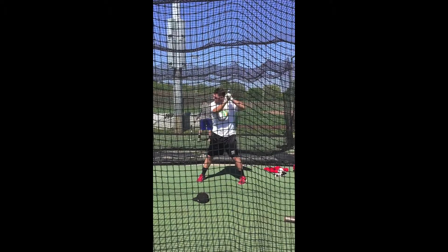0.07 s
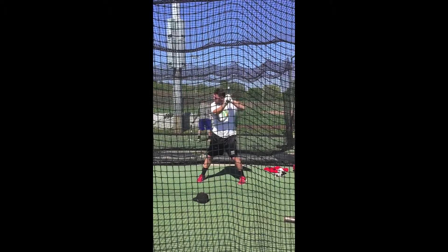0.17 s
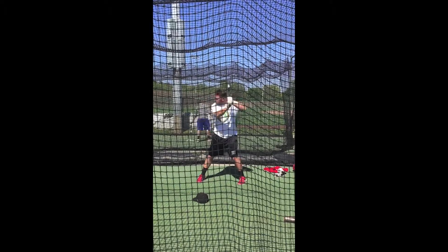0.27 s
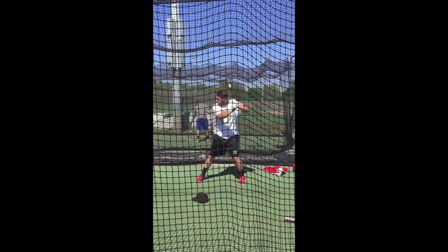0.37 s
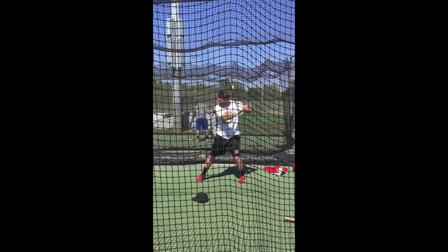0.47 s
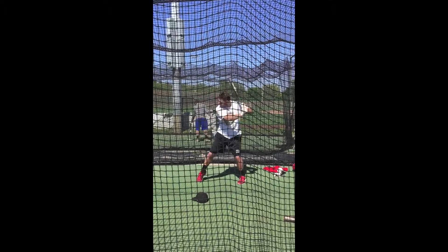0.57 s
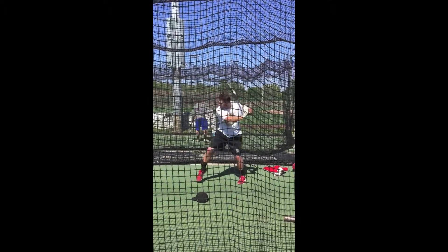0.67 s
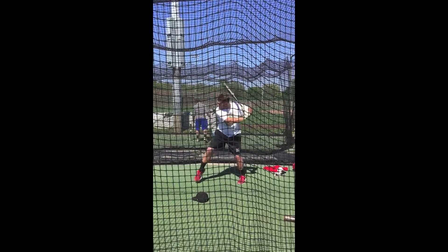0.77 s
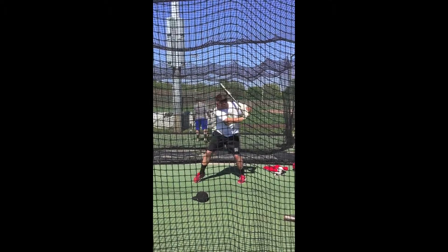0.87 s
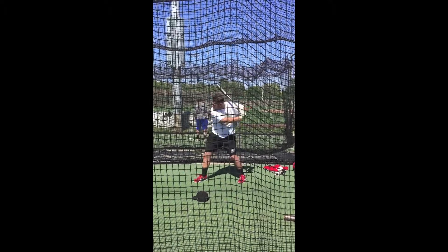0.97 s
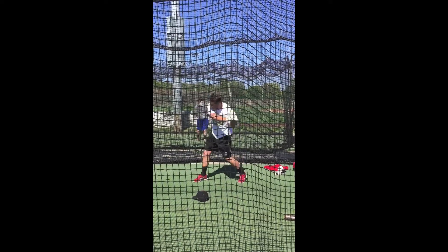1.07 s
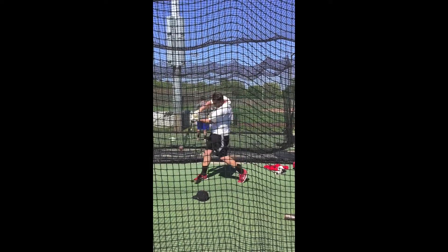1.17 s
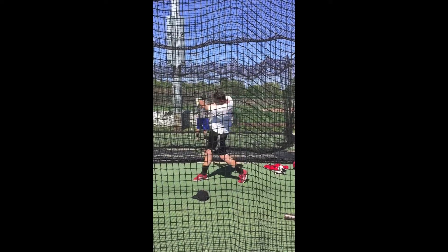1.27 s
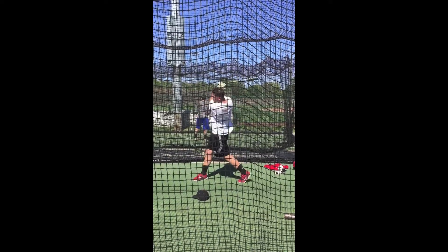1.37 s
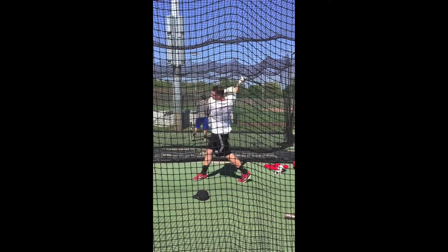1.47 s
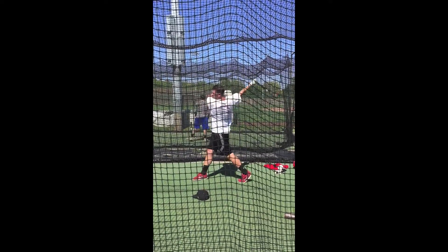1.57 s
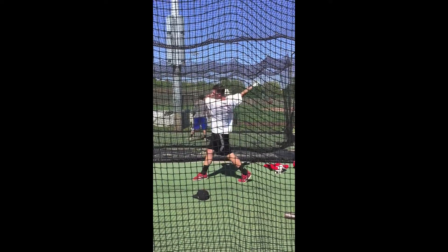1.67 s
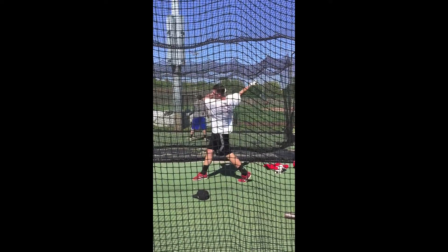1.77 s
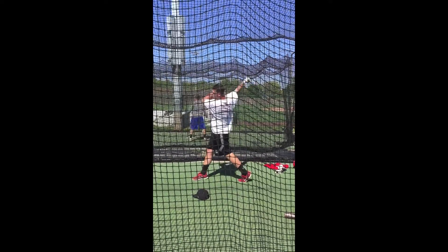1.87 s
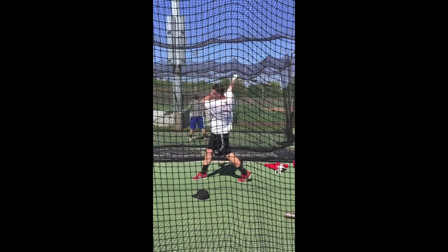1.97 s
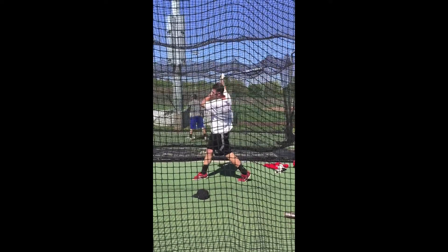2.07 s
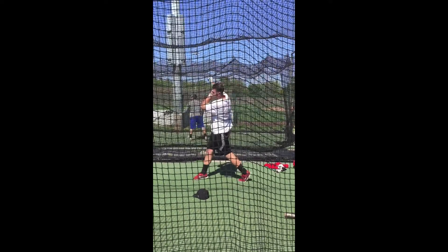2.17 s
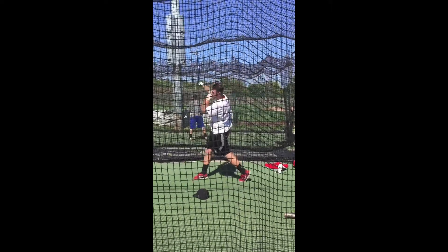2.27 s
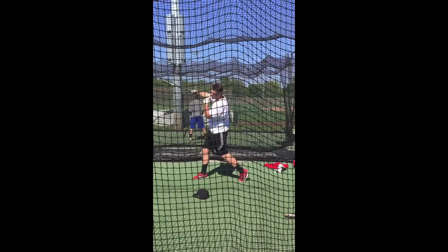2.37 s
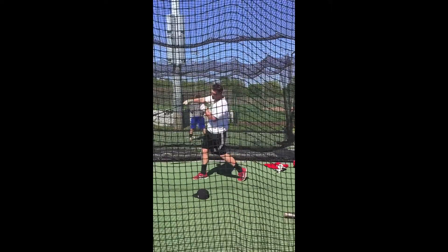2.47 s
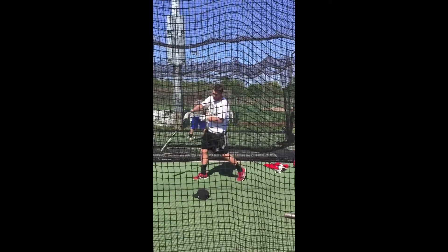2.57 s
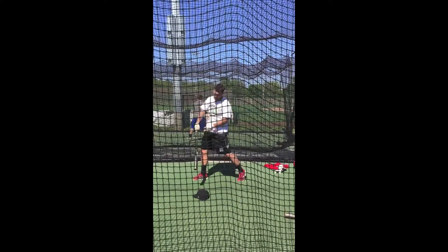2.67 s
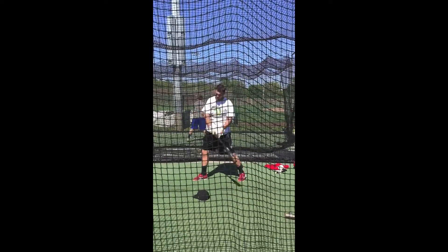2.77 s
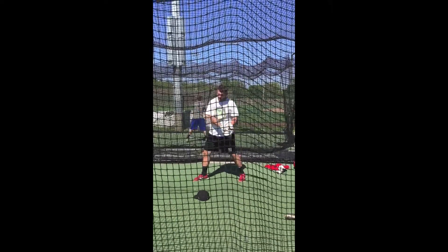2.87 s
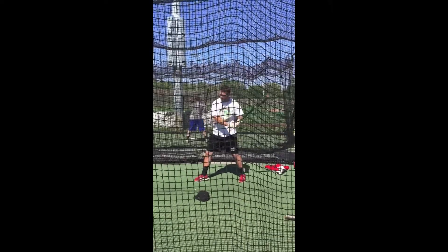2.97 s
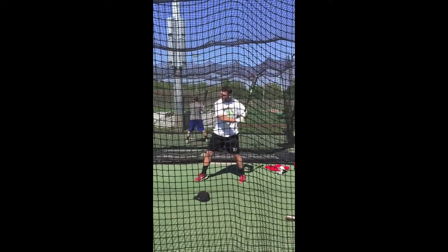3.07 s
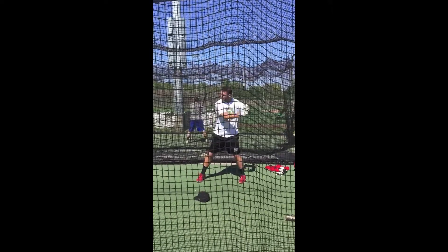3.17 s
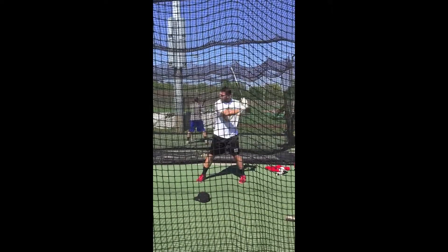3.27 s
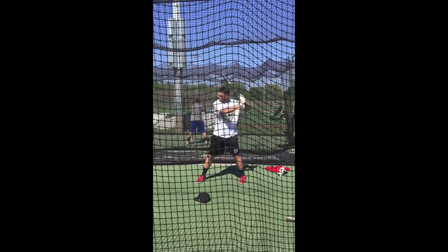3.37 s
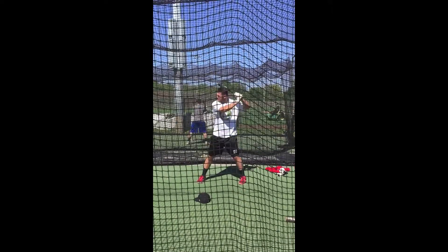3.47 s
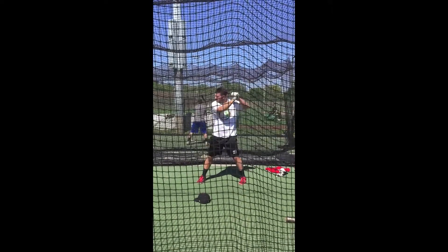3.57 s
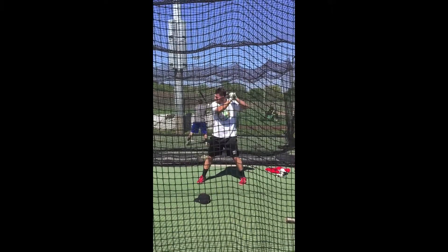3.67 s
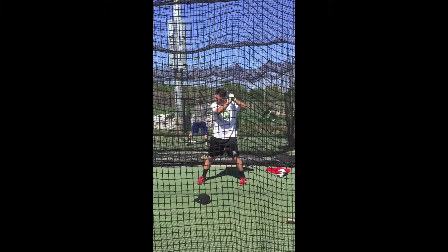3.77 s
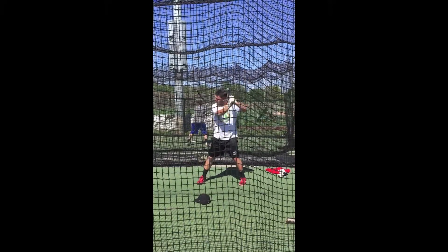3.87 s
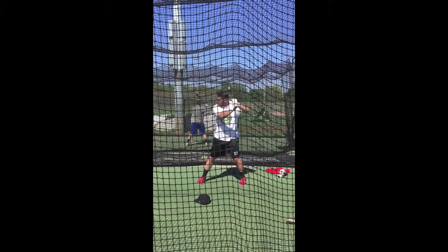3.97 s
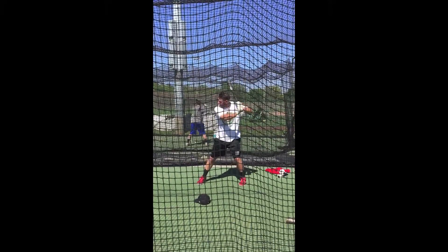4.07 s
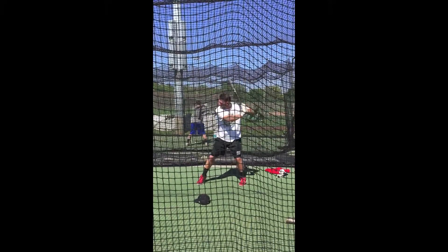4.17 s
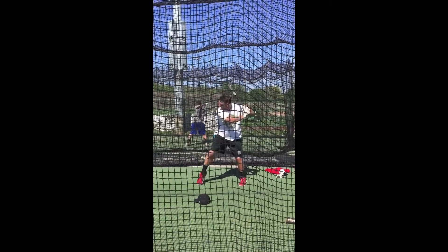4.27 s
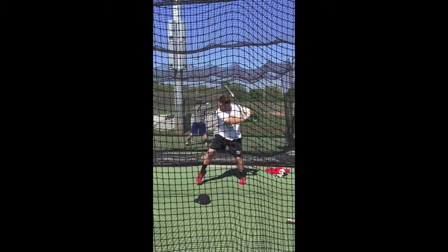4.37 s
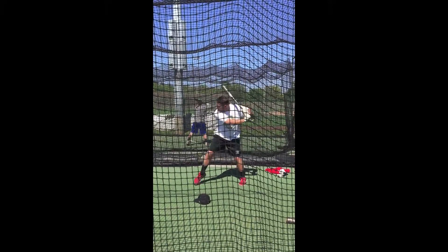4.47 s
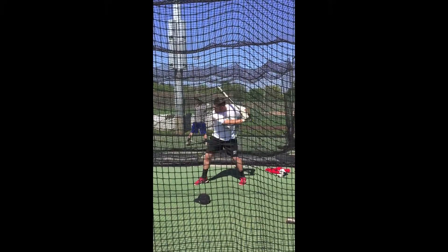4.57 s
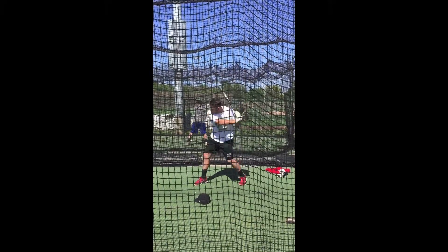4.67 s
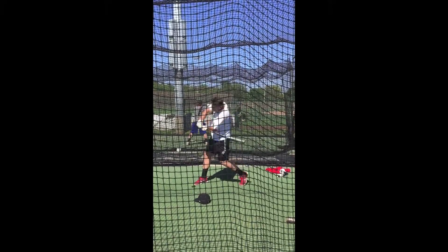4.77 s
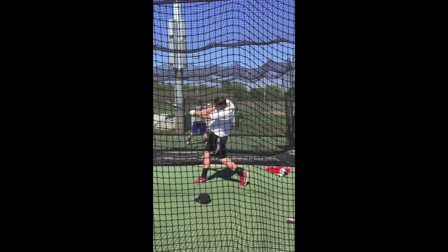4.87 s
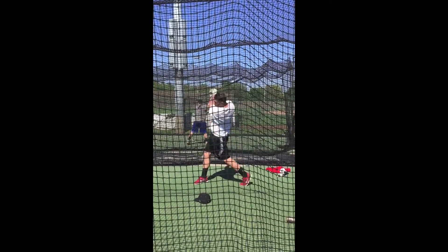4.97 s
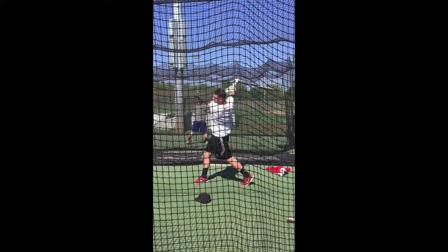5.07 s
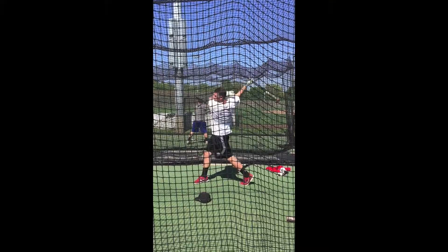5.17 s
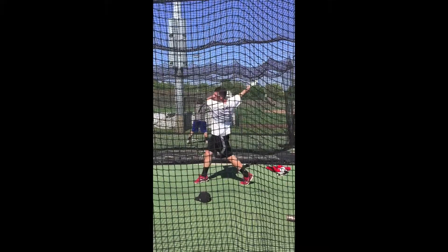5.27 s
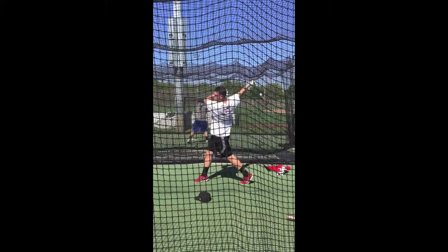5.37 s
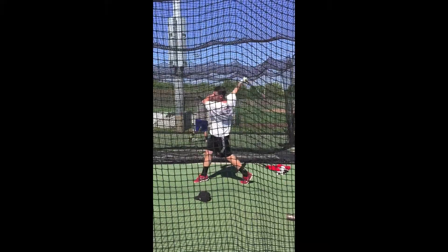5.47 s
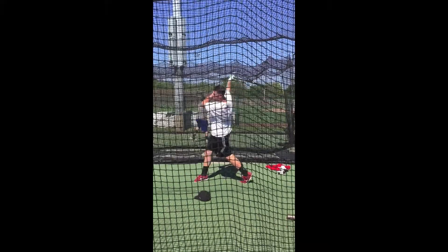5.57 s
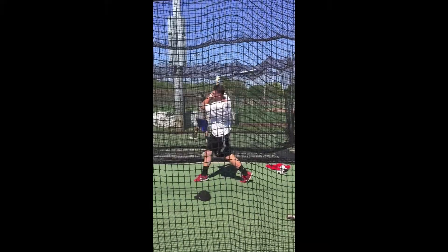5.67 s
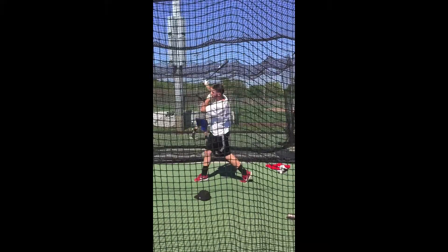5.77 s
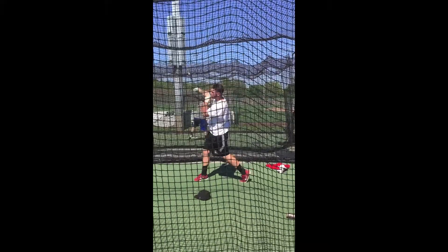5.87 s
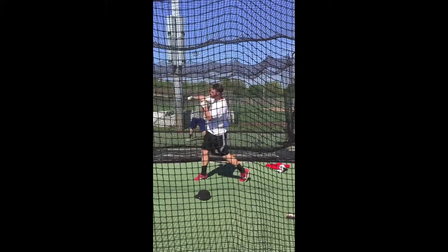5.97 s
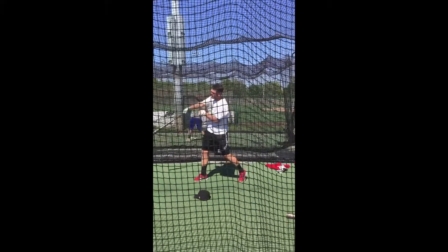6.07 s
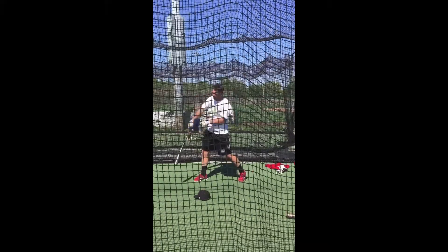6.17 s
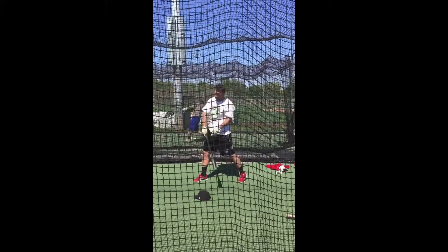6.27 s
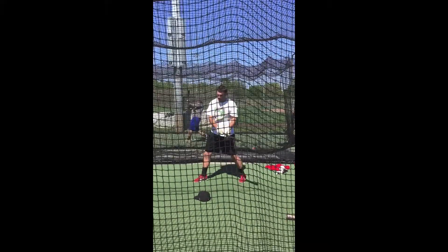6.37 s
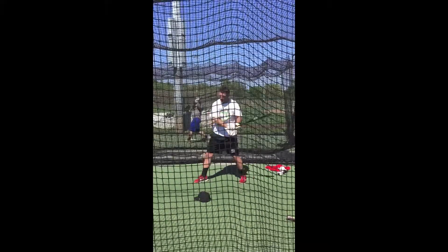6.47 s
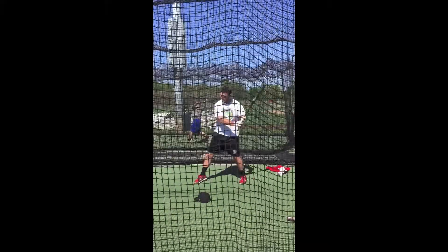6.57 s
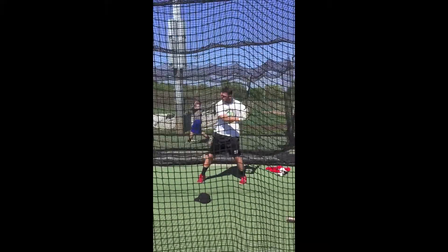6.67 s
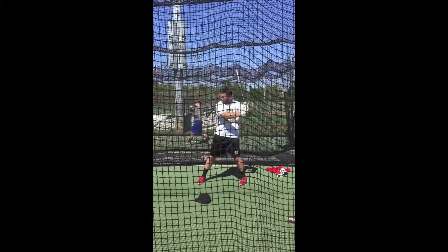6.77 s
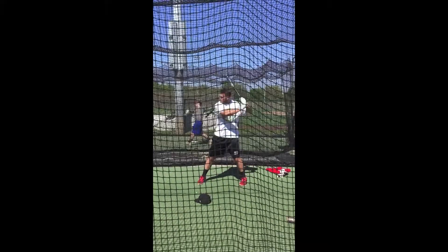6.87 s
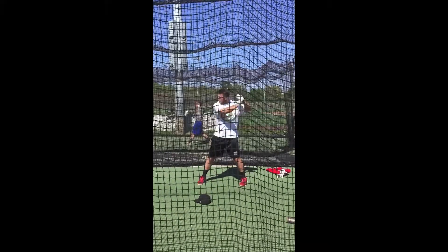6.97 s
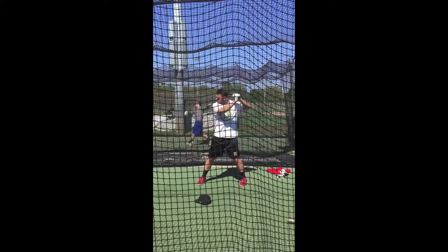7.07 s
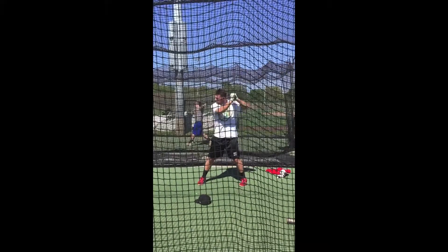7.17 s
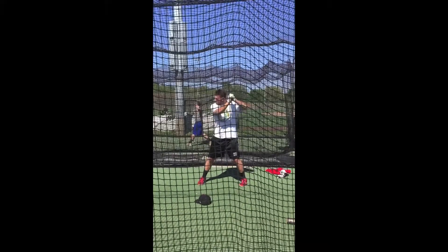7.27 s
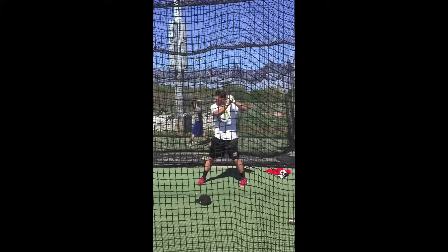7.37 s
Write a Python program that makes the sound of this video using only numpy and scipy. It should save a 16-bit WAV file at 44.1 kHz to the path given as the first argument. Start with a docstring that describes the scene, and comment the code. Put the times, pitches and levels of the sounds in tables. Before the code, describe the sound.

Outdoors, an engine putters low and rattly while a metal bat pings hard against two balls, nets rustle, and another sharp crack answers.

```python
"""Batting practice in an outdoor net cage, with a distant engine throbbing throughout under open-air rustle.
At 1.3 s and again at 4.9 s a metal bat meets a pitched ball: damped modes make the thump and crack, and
the barrel sings on with a Doppler shift as it swings through. After each hit noise swells as the netting is struck.
At 6.3 s a drier crack, a click with a hollow body and discrete reflections, comes from the next cage.
The loud hits overload the microphone and duck the gain."""
import sys
import numpy as np
from scipy import signal
from scipy.fft import rfft, irfft
from scipy.io import wavfile
from scipy.ndimage import uniform_filter1d

SR = 44100
rng = np.random.default_rng(int(sys.argv[2]) if len(sys.argv) > 2 else 0)


def persist_wave(psi):
    """Save psi, clipped to +-1, as 16-bit WAV."""
    counts = np.round(np.clip(psi, -1, 1) * 32767).astype(np.int16)
    wavfile.write(sys.argv[1], SR, np.atleast_2d(counts).T)


N = 327222
T = np.arange(N) / SR
# Levels in the tables are relative: trims, envelopes and the recorder act on them afterwards.


def from_db(db):
    """Decibels to amplitude ratio."""
    return 10 ** (np.asarray(db) / 20)


def rms_one(x):
    """Scale to unit rms."""
    return x / np.sqrt(np.mean(x ** 2) + 1e-20)


def in_time(rows, t=T):
    """Each column of a curve, joined by straight lines."""
    s, *columns = np.transpose(rows)
    return [np.interp(t, s, c) for c in columns]


def add(track, s, sound):
    """Superpose a sound on a track at a given time."""
    at = int(round(s * SR))
    track[at:at + len(sound)] += sound[:N - at]


def convolve(x, response):
    """Linear system: pass a sound through an impulse response."""
    return signal.oaconvolve(x, response)[:len(x)]


def response_of(spectrum, size=4096):
    """Causal, minimum-phase impulse response of a spectrum, by folding the cepstrum; unit energy."""
    hz, db = np.transpose(spectrum)
    grid = np.maximum(np.fft.rfftfreq(size, 1 / SR), 1)
    gain = from_db(np.interp(np.log(grid), np.log(hz), db))
    cepstrum = irfft(np.log(gain))
    cepstrum[1:size // 2] *= 2
    cepstrum[size // 2 + 1:] = 0
    response = irfft(np.exp(rfft(cepstrum)))
    return response / np.linalg.norm(response)


def noise(spectrum, count=N):
    """Coloured noise: white noise filtered by a spectrum of unit energy."""
    response = response_of(spectrum)
    white = rng.standard_normal(count + len(response) - 1)
    return signal.oaconvolve(white, response, "valid")


def band(x, low_hz, high_hz, order=2):
    """Butterworth band-pass."""
    edges = [low_hz, min(high_hz, SR / 2 - 1000)]
    return signal.sosfilt(signal.butter(order, edges, "band", fs=SR, output="sos"), x + 1e-18)


def resonate(x, hz, width_hz):
    """Damped resonator: a pole pair whose radius sets the width, with unit gain on top."""
    r = np.exp(-np.pi * width_hz / SR)
    zeros = np.array([1, 0, -1]) * (1 - r * r) / 2
    poles = [1, -2 * r * np.cos(2 * np.pi * hz / SR), r * r]
    return signal.lfilter(zeros, poles, x + 1e-18)


def dying(t, t60):
    """Exponential damping by 60 dB in t60."""
    return from_db(-60 * t / t60)


def swell(rise_s, t60):
    """One second of an envelope that rises linearly and decays exponentially."""
    t = T[:SR]
    return np.minimum(t / rise_s, 1) * dying(np.maximum(t - rise_s, 0), t60)


def flutter(per_s):
    """Random wobble of spread about 1, joined between draws."""
    return np.interp(T * per_s, np.arange(SR), rng.standard_normal(SR))


def shimmer(hz, width_hz):
    """Narrow-band noise: slow noise modulates a carrier whose centre may move; unit rms."""
    lowpass = signal.butter(2, width_hz / 2, fs=SR, output="sos")
    shake = signal.sosfilt(lowpass, rng.standard_normal((2, N)))
    turn = 2 * np.pi * np.cumsum(hz * np.ones(N)) / SR
    return rms_one(shake[0] * np.cos(turn) + shake[1] * np.sin(turn))


def tail(spectrum, t60, delay_s):
    """Diffuse reverberation: reflections build up over delay_s and die away; unit energy."""
    t = T[:SR]
    build_up = 1 - np.exp(-(t / delay_s) ** 2)
    response = noise(spectrum, count=SR) * dying(t, t60) * build_up
    return response / np.linalg.norm(response)


# engine speed: start_s [s], rate [pulses per s]
ENGINE_RATE = [(0.0, 20.05), (1.48, 20.75), (2.04, 20.5), (5.07, 21.19), (5.56, 20.9), (7.42, 21.54)]


def engine_cycle(first_beat=.775):
    """Phase as the integral of rate: firings counted since the start."""
    rate, = in_time(ENGINE_RATE)
    return np.cumsum(rate) / SR + first_beat


# open-air rustle: start_s [s], low_level_db [dB], treble_level_db [dB]
RUSTLE = [(0.0, -51.5, -71.5), (2.6, -47.5, -68), (4.7, -47, -69.5), (5.9, -57, -74.5), (7.42, -62.5, -76)]
# rustle spectra, low, middle and treble: pitch_hz [Hz], density_db [dB per Hz]
AIR_LOW = [(200, -12.5), (450, 5.5), (600, 0.5), (780, 4.5), (1000, -6), (1200, -2), (1450, -10),
           (2200, -30), (6000, -58.5)]
AIR_MIDDLE = [(600, -26.5), (1500, 0), (2400, 11), (3200, 5.5), (4200, -1.5), (5500, -34.5), (12000, -50.5)]
AIR_HISS = [(2000, -18), (4500, 5), (5300, 1.5), (6300, 1), (9000, -4.5), (10300, -9.5), (11500, -5.5),
            (16000, -14)]
# the middle part moves with the treble about a mean level of its own
MIDDLE_DB, MIDDLE_FOLLOWS = -64.5, 0.99
# dull, far wash that comes and goes: start_s [s], level_db [dB]
WASH_LEVEL = [(0, -78), (2.05, -68), (2.22, -58), (2.42, -65), (5.35, -72), (5.65, -62.5), (6.1, -60),
              (6.6, -64), (7.42, -66)]
# spectrum of the wash: pitch_hz [Hz], density_db [dB per Hz]
WASH = [(500, -27.5), (900, -1), (1200, -0.5), (1450, -3.5), (2100, -21.5), (4000, -43.5)]


def open_air(pulsing=0.07):
    """Amplitude-modulated broadband noise: rustle and far wash, with an engine rush once in each cycle."""
    low_db, hiss_db = in_time(RUSTLE)
    wash_db, = in_time(WASH_LEVEL)
    middle_db = MIDDLE_DB + MIDDLE_FOLLOWS * (hiss_db - hiss_db.mean())
    rush = rms_one(np.exp(pulsing * np.cos(2 * np.pi * (engine_cycle() - .1))))
    low = from_db(low_db - 6.5 + 0.78 * flutter(22)) * rush * noise(AIR_LOW)
    middle = from_db(middle_db + 0.69 * flutter(25)) * rush * noise(AIR_MIDDLE)
    hiss = from_db(hiss_db - 2 + 0.95 * flutter(48)) * rush ** .5 * noise(AIR_HISS)
    wash = from_db(wash_db + 1.8 * flutter(13)) * noise(WASH)
    return low + middle + hiss + wash


def exhaust(modes, beats):
    """Impulse excitation: each firing strikes every resonance with a strength of its own."""
    out = np.zeros(N)
    for hz, width_hz, db in modes:
        pulses = np.zeros(N)
        pulses[beats] = from_db(db + 1.3 * rng.standard_normal(len(beats)))
        out += resonate(pulses, hz, width_hz)
    return out


# engine loudness: start_s [s], deep_throb_level_db [dB], upper_knock_level_db [dB]
ENGINE_LEVEL = [(0.0, -31, -42), (0.4, -38, -34), (0.9, -34.5, -34.5), (4.3, -34, -33.5),
                (6.2, -33.5, -37.5), (6.8, -31, -42.5), (7.42, -30.5, -42)]
# engine resonances, deep and upper: pitch_hz [Hz], width_hz [Hz], level_db [dB]
THROB_MODES = [(99.6, 13, 20), (122.4, 5.2, 11.5)]
KNOCK_MODES = [(180, 20, -10.5), (213.9, 18.8, 4), (298.4, 21, -6), (356, 35, -7.5)]
# steady rumble: pitch_hz [Hz], density_db [dB per Hz]
RUMBLE = [(20, -48), (40, -8), (65, -2), (100, -2.5), (220, -4.5), (330, -11), (430, -30), (700, -54),
          (2000, -74.5)]


def engine():
    """Source and filter: nearly even exhaust pulses ring low resonances over a faint rumble; the top is gone."""
    throb_db, knock_db = in_time(ENGINE_LEVEL)
    cycle = engine_cycle() + .007 * flutter(15)
    beats = np.flatnonzero(np.diff(np.floor(cycle)) > 0)
    throb = rms_one(band(exhaust(THROB_MODES, beats), 27, 180, order=4))
    knock = rms_one(band(exhaust(KNOCK_MODES, beats), 122, 339.0, order=6))
    rumble = from_db((throb_db + knock_db) / 2 - 7.5) * noise(RUMBLE)
    return from_db(throb_db - 2.5) * throb + from_db(knock_db - 4.0) * knock + rumble


def each_cycle(cycle, place, half_length, spread_db):
    """Periodic bursts at one place in every engine cycle, each with a strength of its own; unit rms."""
    turn = np.round(cycle - place)
    strengths = from_db(spread_db * np.clip(rng.standard_normal(SR), -2, 2))
    burst = np.exp(-((cycle - place - turn) / half_length) ** 2)
    return rms_one(strengths[turn.astype(int)] * burst)


# loose panel rattling on the engine: start_s [s], level_db [dB], pitch_hz [Hz]
RATTLE = [(0.0, -55.5, 1800), (0.7, -53, 1789), (1.0, -56, 1755), (2.0, -61.5, 1750), (2.5, -55.5, 1743),
          (3.6, -58.5, 1768), (4.4, -62.5, 1716), (7.42, -61.5, 1682)]
RATTLE_WIDTH_HZ = 170
# the panel's shakes: place [0-1 of a cycle], level_db [dB]
SHAKES = [(0.091, -14.5), (.37, -14), (.88, -15.5)]
SHAKE_LENGTH = .085  # half length, in cycles
# loudness of the chattering parts: start_s [s], level_db [dB]
CLATTER_LEVEL = [(0.0, -65.5), (1.0, -64.5), (2.0, -65), (2.5, -59.5), (3.7, -63.5), (4.7, -62.5),
                 (6.0, -71.5), (7.42, -78.5)]
# parts that chatter once a cycle: place [0-1 of a cycle], half_length [cycles], pitch_hz [Hz], width_hz [Hz],
# level_db [dB], spread_db [dB from cycle to cycle]
CLATTER = [(0, 0.22, 820, 140, -1, 2.5), (.37, 0.16, 760, 160, -0.5, 2), (.15, .2, 1210, 220, -11, 3.5),
           (.92, 0.15, 2440, 240, -5.5, 4), (.35, 0.14, 2300, 800, -9.5, 4), (0.3, 0.28, 3580, 160, -10, 4),
           (.95, 0.18, 4050, 430, -13, 4.5), (0.05, .17, 8100, 1600, -18, 4)]
# thin squeak in step with the engine: start_s [s], level_db [dB]
SQUEAK_LEVEL = [(0.0, -75), (.25, -71), (.76, -76.5), (.86, -80), (2.5, -84), (3.0, -85), (4.3, -80.5),
                (7.42, -90.5)]
SQUEAK_PLACE = 0.29  # of a cycle
# partials of the squeak: pitch_hz [Hz], width_hz [Hz], level_db [dB]
SQUEAK_MODES = [(3960, 100, -7.5), (5250, 140, 0), (5790, 220, -6.5), (6860, 700, -10)]


def clatter(spread_db=2.2, squeak_length=0.32, alternate_db=3):
    """Synchronous modulation: loose parts rattle, chatter and squeak, each at its own place in the cycle."""
    cycle = engine_cycle()
    rattle_db, rattle_hz = in_time(RATTLE)
    clatter_db, = in_time(CLATTER_LEVEL)
    squeak_db, = in_time(SQUEAK_LEVEL)
    shakes = sum(from_db(db) * each_cycle(cycle, place, SHAKE_LENGTH, spread_db) for place, db in SHAKES)
    # the panel also buzzes between its shakes
    out = from_db(rattle_db) * rms_one(shakes + .7) * shimmer(rattle_hz, RATTLE_WIDTH_HZ)
    for place, half_length, hz, width_hz, db, uneven_db in CLATTER:
        bursts = each_cycle(cycle, place, half_length, uneven_db)
        out += from_db(clatter_db + db) * bursts * shimmer(hz, width_hz)
    # every other squeak is stronger
    alternate = from_db(alternate_db * (np.round(cycle - SQUEAK_PLACE) % 2))
    pips = each_cycle(cycle, SQUEAK_PLACE, squeak_length, spread_db) * alternate
    partials = sum(from_db(db) * shimmer(hz, width_hz) for hz, width_hz, db in SQUEAK_MODES)
    return out + from_db(squeak_db) * rms_one(pips) * partials


# faint, far bird slurs: start_s [s], length_s [s], start_pitch_hz [Hz], end_pitch_hz [Hz], level_db [dB]
BIRDS = [(2.129, 0.18, 1130, 1165, -50), (5.921, 0.07, 3200, 3220, -57), (5.995, 0.088, 2800, 1710, -57),
         (6.292, 0.047, 3300, 3160, -58), (6.62, 0.037, 3680, 3300, -57), (6.829, 0.081, 2480, 2630, -54)]


def birds(blur_hz=40):
    """Frequency modulation: short, soft calls slide in pitch, blurred by distance."""
    out = np.zeros(N)
    for s, length_s, start_hz, end_hz, db in BIRDS:
        count = int(length_s * SR)
        hz = np.linspace(start_hz, end_hz, count) + blur_hz * flutter(245)[:count]
        call = np.hanning(count) * np.sin(2 * np.pi * np.cumsum(hz) / SR)
        add(out, s, from_db(db - 2.0) * call)
    return out


# short ticks of several kinds (engine ticks near 4 kHz, scuffs, net ticks, a slap after the dry crack):
# start_s [s], level_db [dB], pitch_hz [Hz], t60_s [s]
TICKS = [(0.296, -41, 5500, 0.055), (0.446, -40.5, 4030, 0.077), (0.505, -40, 3950, .07),
         (1.331, -36, 8750, .04), (1.725, -38, 2350, 0.093), (2.641, -39, 4030, 0.064),
         (3.226, -43, 5400, .07), (3.3235, -45, 5440, .07), (4.1826, -44, 4070, 0.12),
         (4.393, -38.5, 3970, 0.087), (4.496, -35.5, 4070, .07), (4.809, -41.5, 3900, 0.11),
         (5.009, -35, 4100, .06), (5.157, -42.5, 3400, 0.072), (5.397, -44, 2960, .07),
         (5.8008, -47, 9070, .06), (6.413, -17.5, 2930, 0.015), (6.9392, -48, 6300, .07)]


def ticks(rise_s=0.00154, width_hz=700, spray_db=-16):
    """Noise bursts through a resonance: short resonant ticks, each with a fine spray from 6.8 to 9.5 kHz."""
    out = np.zeros(N)
    for s, db, hz, t60 in TICKS:
        burst = rng.standard_normal(SR)
        tick = rms_one(resonate(resonate(burst, hz, width_hz), hz, 3 * width_hz))
        spray = from_db(spray_db) * rms_one(band(burst, 6800, 9500))
        add(out, s, from_db(db - 14.0) * (tick + spray) * swell(rise_s, t60))
    return out


# balls running into the net: start_s [s], slap_level_db [dB], cord_snap_level_db [dB], swish_level_db [dB],
# mesh_sway_level_db [dB], swish_rise_s [s], swish_t60_s [s]
NET = [(1.570, -45, -51, -62.5, -64, 0.018, 0.71), (1.765, -55, -57, -73, -75, 0.037, 2.1),
       (5.2995, -42, -66, -59.5, -60, 0.03, 0.46), (5.446, -48, -47.5, -50, -51, 0.02, 0.5),
       (6.777, -44.5, -65, -57, -70, 0.043, 0.16)]
SLAP_RISE_S, SLAP_T60_S, SNAP_RISE_S, SNAP_T60_S = 0.0027, 0.22, 0.0018, 0.04
SWAY_RISE_S, SWAY_T60_S = 0.11, 0.67
# spectra of the slap and of the swaying mesh: pitch_hz [Hz], density_db [dB per Hz]
SLAP = [(400, -33), (900, -6.5), (1250, 0.5), (1700, -4), (2300, 0.5), (3500, -6), (5000, -15), (9000, -26),
        (16000, -40)]
SWAY = [(400, -17), (750, 1), (1100, 2), (2000, -1.5), (3000, 2), (4200, -8.5), (5200, -14), (7500, -19.5),
        (10000, -32)]
# resonances of the sliding cords: pitch_hz [Hz], width_hz [Hz], level_db [dB]
CORD_MODES = [(3470, 1900, -2), (5460, 1500, -11), (6740, 1400, -2.5), (8340, 1800, -7),
              (12700, 6200, -8.5)]
# fine hiss while the net settles after the first ball: start_s [s], level_db [dB]
SIFT_LEVEL = [(1.6, -110), (1.67, -68), (1.76, -77), (1.83, -65), (1.93, -76), (2.06, -72), (2.14, -77),
              (2.25, -110)]
# spectrum of that hiss: pitch_hz [Hz], density_db [dB per Hz]
SIFT = [(3000, -20), (7500, -1), (10000, -4), (14000, -2), (16000, -6.5)]


def netting(grain_db=1.0, clumps_db=2.0, sway_grain_db=3.5):
    """Impact, then sliding friction: cords snap taut and slide over ball and each other; the mesh sways on."""
    slap, slide, sway = np.zeros((3, N))
    for s, slap_db, snap_db, swish_db, sway_db, rise_s, t60 in NET:
        add(slap, s, from_db(slap_db) * swell(SLAP_RISE_S, SLAP_T60_S))
        add(slide, s, from_db(snap_db) * swell(SNAP_RISE_S, SNAP_T60_S))
        add(slide, s, from_db(swish_db) * swell(rise_s, t60))
        add(sway, s, from_db(sway_db) * swell(SWAY_RISE_S, SWAY_T60_S))
    cords = np.zeros(N)
    for hz, width_hz, db in CORD_MODES:
        uneven_db = clumps_db * flutter(60) + grain_db * flutter(300)
        cords += from_db(db + uneven_db) * shimmer(hz, width_hz)
    mesh = sway * rms_one(noise(SWAY) * from_db(sway_grain_db * flutter(250)))
    sift_db, = in_time(SIFT_LEVEL)
    struck = slap * noise(SLAP) + slide * rms_one(cords) + from_db(sift_db) * noise(SIFT)
    return mesh + struck * from_db(grain_db * flutter(450))


NEXT_CAGE_S, NEXT_CAGE_DB, NEXT_CAGE_TOP_HZ = 6.3286, 10.5, 9000
# hollow body of the dry crack: pitch_hz [Hz], level_db [dB], t60_s [s]
HOLLOW_MODES = [(760, -18, 0.0065), (1310, 1.5, 0.0044), (1700, -8, 0.0048), (2700, -6, 0.0065)]
BODY_RISE_S = 0.00042
# slaps back off posts: delay_s [s after the crack], level_db [dB]
POSTS = [(.0075, -10), (.0115, -7), (0.0197, -5.5), (0.0265, -1), (0.034, -19), (.037, -12), (0.044, -15)]
POST_TOP_HZ = 4630
# flutter off a row of fence panels
FENCE_DELAY_S, FENCE_STEP_S, FENCE_DB, FENCE_TOP_HZ = .1112, .0041, -10.5, 1790
# spectra of the dry crack, of scatter close by and of far reflections (the last two also serve the bat):
# pitch_hz [Hz], density_db [dB per Hz]
DRY_CRACK = [(100, -9), (450, -22), (750, -19.5), (1200, -9.5), (1800, -7.5), (2200, -14), (2900, -12),
             (3700, -18.5), (4400, -16.5), (8000, -23), (10000, -25.5), (16000, -52)]
SCATTER = [(150, 10.5), (450, -8.5), (900, 1.5), (2000, -1), (3000, 3), (4500, -8), (8000, -13.5),
           (16000, -22)]
FAR_FIELD = [(200, -18), (700, -21.5), (2000, 0), (3500, -1), (5000, -6.5), (9000, -15.5), (16000, -39)]


def next_cage(click_db=-9, crack_scatter_db=-14, slap_scatter_db=-7, slap_t60=0.0054, sizzle_db=-47,
              sizzle_t60=0.18, grain_db=3.5, late_db=-30, late_delay_s=.215, count=6):
    """Impulse and discrete echoes: a crack with a hollow body, net sizzle, post slaps and a fence flutter."""
    crack, slaps, fence, body, sizzle, late = np.zeros((6, N))
    click = np.eye(1, SR // 20)[0]
    t = T[:SR // 20]
    add(crack, NEXT_CAGE_S, from_db(NEXT_CAGE_DB) * band(click, 130, NEXT_CAGE_TOP_HZ))
    for hz, db, t60 in HOLLOW_MODES:
        envelope = np.minimum(t / BODY_RISE_S, 1) * dying(t, t60)
        add(body, NEXT_CAGE_S, from_db(db) * np.sin(2 * np.pi * hz * t) * envelope)
    for delay_s, db in POSTS:
        burst = rng.standard_normal(len(t)) * dying(t, slap_t60)
        slap = band(burst / np.linalg.norm(burst), 190, POST_TOP_HZ)
        add(slaps, NEXT_CAGE_S + delay_s, from_db(db) * slap)
    for panel in range(count):
        # the middle panels return the most
        facing = np.sin(np.pi * (panel + .5) / count)
        delay_s = FENCE_DELAY_S + (panel + rng.uniform(-0.21, .2)) * FENCE_STEP_S
        echo = band(click, 580, FENCE_TOP_HZ, order=3)
        add(fence, NEXT_CAGE_S + delay_s, facing * from_db(FENCE_DB) * echo)
    near = from_db(crack_scatter_db) * convolve(crack, tail(SCATTER, t60=0.026, delay_s=0.00073))
    near += from_db(slap_scatter_db) * convolve(slaps, tail(SCATTER, t60=0.037, delay_s=0.0018))
    cords = rms_one(band(rng.standard_normal(SR), 5300, 13000))
    add(sizzle, NEXT_CAGE_S, from_db(sizzle_db) * swell(0.0071, sizzle_t60) * cords)
    far = from_db(-26.0) * convolve(crack + slaps, tail(FAR_FIELD, t60=0.77, delay_s=.007))
    # a brighter wash comes back from across the field
    wash = band(tail(SCATTER, t60=0.18, delay_s=0.032), 3260, 5300)
    add(late, NEXT_CAGE_S + late_delay_s, from_db(NEXT_CAGE_DB + late_db) * wash)
    grain = from_db(grain_db * flutter(400))
    coloured = from_db(click_db) * crack + slaps + fence + (near + far + late) * grain
    return body + sizzle * grain + convolve(coloured, response_of(DRY_CRACK))


# short-lived modes of the bat: pitch_hz [Hz], level_db [dB], t60_s [s]
BAT_MODES = [(2130, -15, .05), (2475, -1.5, .05), (2745, -5.5, .04), (2990, -18, .04), (3760, -10, .04),
             (4170, -12, .035), (5150, -23, .03), (8690, -27, .022)]


def contact(thump_db, thump_hz, modes_db, thump_t60=0.01, upper_ratio=1.553, upper_db=0):
    """Modal impact: the ball flattens with a damped thump and a push of air, and the bat's short modes ring."""
    t = T[:SR // 4]
    lower = np.sin(2 * np.pi * thump_hz * t)
    upper = from_db(upper_db) * np.sin(2 * np.pi * thump_hz * upper_ratio * t)
    thump = from_db(thump_db) * band((lower + upper) * dying(t, thump_t60), 541, 1400, order=3)
    push = from_db(thump_db - 15.5) * band(dying(t, 0.072), 50, 240, order=3)
    modes = np.zeros(len(t))
    for hz, db, t60 in BAT_MODES:
        modes += from_db(db + modes_db) * np.sin(2 * np.pi * hz * t) * dying(t, t60)
    return thump + push, modes


BARREL_HZ, BARREL_T60_S, OFF_LOBE_DB = 2804, .7, -30.5
FASTEST_S = .043  # after contact the barrel gains speed until here, then is braked


def barrel(direction, top_speed, swing_s, lobes, waver_hz=14):
    """Doppler effect on the long barrel note: flat behind the batter (1), sharp towards the field (-1)."""
    t = T[:SR // 2]
    speed = top_speed * np.exp(-((t - FASTEST_S) / swing_s) ** 2)
    beam = from_db(OFF_LOBE_DB) * dying(t, BARREL_T60_S)
    for s, width_s, db in lobes:
        beam = beam + from_db(db) * np.exp(-((t - s) / width_s) ** 2)
    hz = BARREL_HZ * (1 - direction * speed / 343)  # speed of sound in m/s
    wavering_hz = hz + waver_hz * flutter(220)[:len(t)]
    return beam * np.sin(2 * np.pi * np.cumsum(wavering_hz) / SR)


# bat meets ball: start_s [s], thump_level_db [dB], thump_pitch_hz [Hz], crack_level_db [dB],
# short_modes_level_db [dB], barrel_ring_level_db [dB], field_return_level_db [dB],
# top_barrel_speed [m/s], swing_half_length_s [s]
HITS = [(1.275, 4, 689, 2.5, -7.5, -16, -10, 14.8, 0.098), (4.9021, 6.5, 735, 4, 0, -12, -4.5, 16, .055)]
# spectrum of the crack: pitch_hz [Hz], density_db [dB per Hz]
CRACK = [(300, -15.5), (1500, -8.5), (3000, 8), (4300, 1), (6000, -10), (8500, -2), (10000, -14),
         (12000, -15), (16000, -22)]
# lobes of the barrel note sweeping past the microphone: delay_s [s after contact], half_width_s [s], level_db [dB]
LOBES = [(.006, 0.024, -10.5), (0.042, .0165, 1.5)]
# barrel note returning from around the field: delay_s [s], direction [1 behind the batter, -1 ahead], level_db [dB]
RING_ECHOES = [(.004, -1, -21.5), (0.061, -.9, -26.5), (0.171, -0.2, -33), (.19, 1, -34),
               (0.218, -1.1, -40), (0.286, 0.7, -43), (.32, -1, -44), (0.438, 0.84, -42.5), (.48, -1, -43)]


def bat(crack_t60=0.008, click_db=2, click_t60=.002, wall_db=2, wall_thump_db=-38, wall_delay_s=.126,
        diffuse_db=-7, echo_half_length_s=0.036, break_up=0.62):
    """Direct sound, early scatter and late reflections: both hits, the cage and returns across the field."""
    direct, snap, far_snap, shell, ring, returns = np.zeros((6, N))
    t = T[:SR // 4]
    for s, thump_db, thump_hz, crack_db, modes_db, ring_db, field_db, top_speed, swing_s in HITS:
        thump, modes = contact(thump_db, thump_hz, modes_db)
        crack = from_db(crack_db) * noise(CRACK, count=len(t)) * dying(t, crack_t60)
        click = band(rng.standard_normal(len(t)) * dying(t, click_t60), 5000, 10000, order=3)
        add(direct, s, thump + crack + from_db(click_db) * click)
        # single impulses excite the reflections
        add(snap, s, from_db([crack_db]))
        add(far_snap, s, from_db([field_db]))
        add(shell, s, modes)
        add(ring, s, from_db(ring_db) * barrel(1, top_speed, swing_s, LOBES))
        for delay_s, direction, db in RING_ECHOES:
            lobe = [(FASTEST_S, echo_half_length_s, 0)]
            echo = barrel(direction, top_speed, swing_s + echo_half_length_s, lobe, waver_hz=42)
            add(returns, s + delay_s, from_db(ring_db + db) * echo)
    cage = from_db(2.5 + .8 * flutter(600)) * convolve(snap, tail(SCATTER, t60=.17, delay_s=.004))
    cage_ring = from_db(-25) * convolve(shell, tail(FAR_FIELD, t60=.13, delay_s=.008))
    # the long way over the field takes the top off the crack
    far_crack = convolve(far_snap, tail(FAR_FIELD, t60=0.58, delay_s=0.02))
    field = from_db(2.7 * flutter(120)) * band(far_crack, 300, 4400, order=3)
    # a far wall sends back a dull, smeared copy of the ping and the thump
    ping = from_db(wall_db) * band(far_snap, 2250, 2680)
    thud = from_db(wall_thump_db) * band(direct, 1030, 1400)
    smeared = convolve(ping + thud, tail(FAR_FIELD, t60=0.12, delay_s=0.028))
    wall = np.interp(T - wall_delay_s, T, smeared, left=0)
    # the returns of the barrel note break up and smear on their way
    returns *= 1 + break_up * flutter(160)
    returns += from_db(diffuse_db - 13) * convolve(returns, tail(FAR_FIELD, t60=0.63, delay_s=0.018))
    return direct + shell + ring + cage + cage_ring + field + wall + returns


def scene():
    """Superposition of every source as it reaches the microphone behind the cage."""
    background = open_air() + engine() + clatter() + birds()
    return (background + ticks() + netting() + next_cage() + bat())[None]


CUTOFF_HZ = 15900


def record(dry, ceiling=0.73, threshold_db=-9, most_db=6.0, release_db_per_s=16, attack_s=0.016):
    """Saturation and compression: peaks overload, the gain ducks and recovers, deepest bass and top are cut."""
    clipped = dry / (1 + (dry / ceiling) ** 4) ** .25
    power = np.abs(uniform_filter1d(clipped ** 2, size=128))
    level_db = 20 * np.log10(np.sqrt(power) + 1e-9)
    over_db = np.clip(level_db - threshold_db, 0, most_db)
    # a running maximum on a rising ramp gives a steady release
    ramp_db = release_db_per_s * T
    held_db = np.maximum.accumulate(over_db + ramp_db, axis=-1) - ramp_db
    pole = np.exp(-1 / (attack_s * SR))
    ducked = clipped * from_db(-signal.lfilter([1 - pole], [1, -pole], held_db))
    thinned = signal.sosfilt(signal.butter(2, 32, "high", fs=SR, output="sos"), ducked)
    return signal.sosfiltfilt(signal.ellip(8, .1, 50, CUTOFF_HZ, fs=SR, output="sos"), thinned)


dry = scene()
out = record(dry)
persist_wave(out)
```